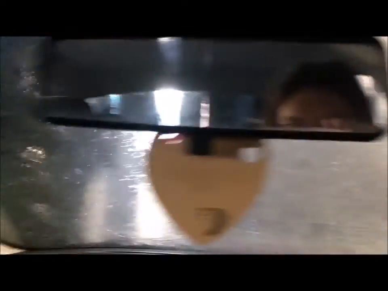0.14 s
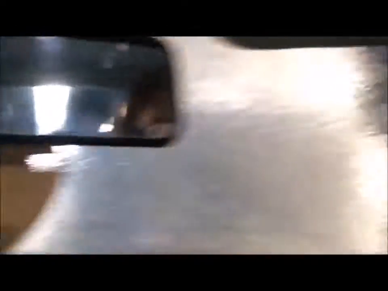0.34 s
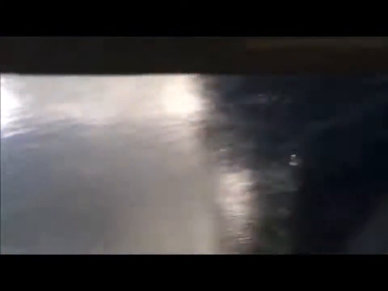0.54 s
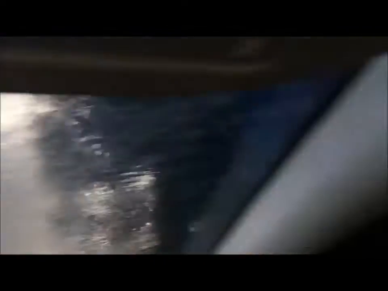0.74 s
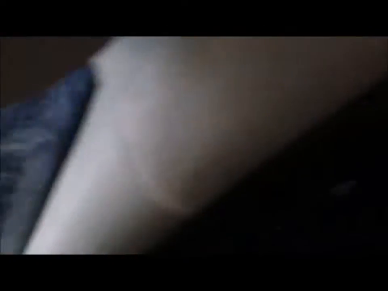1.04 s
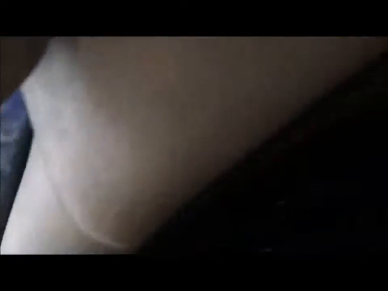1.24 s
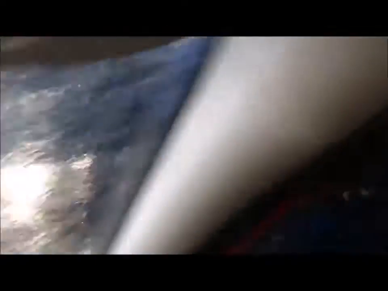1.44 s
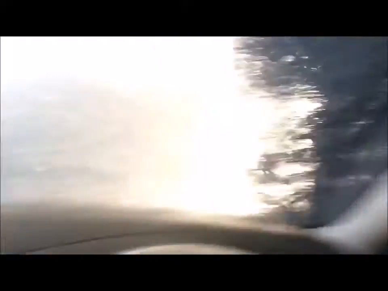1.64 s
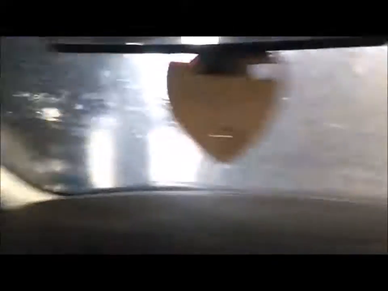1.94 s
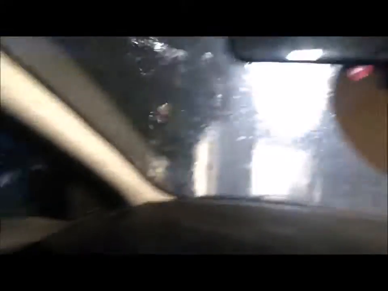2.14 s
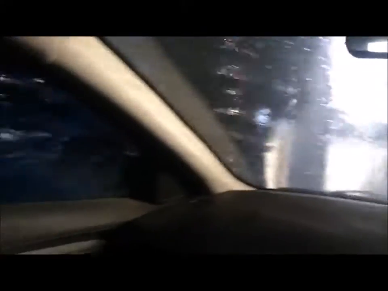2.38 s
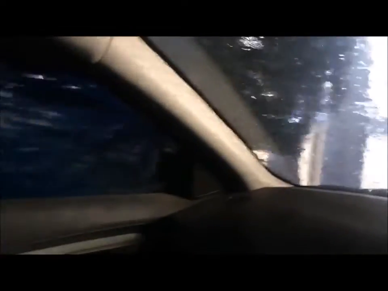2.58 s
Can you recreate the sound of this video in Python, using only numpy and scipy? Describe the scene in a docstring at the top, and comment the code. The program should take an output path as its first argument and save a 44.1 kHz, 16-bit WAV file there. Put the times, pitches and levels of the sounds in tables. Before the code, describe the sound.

Car wash jets hiss hard over a closed car, with low booming shudders through its panels

```python
"""A broad hiss of dense spray on glass and roof, inside a closed car under the jets of an automatic wash.
Spray: random drops, finer noise and ringing fat drops, in fluttering bands, through glass resonances.
Boom: the jets' pressure shakes the panels; noise drives the lowest cabin resonances, swelling as jets sweep
over."""
import sys
import numpy as np
from scipy import signal
from scipy.io import wavfile
from scipy.ndimage import uniform_filter1d

SR = 44100
rng = np.random.default_rng(int(sys.argv[2]) if len(sys.argv) > 2 else 0)


def bounce(signal):
    """Save signal as a 16-bit WAV file at the path given by the first command-line argument."""
    frames = np.transpose(np.atleast_2d(signal))
    limited = np.clip(frames, -1, 1)
    pcm = np.round(limited * 32767).astype(np.int16)
    wavfile.write(sys.argv[1], SR, pcm)


N = 119511


def from_db(db):
    """Decibels to gain."""
    return 10 ** (np.asarray(db) / 20)


def rms_one(x):
    """Scale to rms 1."""
    return x / np.sqrt(np.mean(x ** 2) + 1e-20)


def in_time(rows):
    """Table columns as curves, one value per sample."""
    time_s, *columns = np.transpose(rows)
    return [np.interp(np.arange(N) / SR, time_s, column) for column in columns]


def drift(pole_hz):
    """Slow random wander of rms about 1: noise through a double pole, run at SR / 40."""
    r = np.exp(-2 * np.pi * pole_hz * 40 / SR)
    noise = rng.standard_normal(N // 40 + 2002)
    slow = signal.lfilter([1], [1, -2 * r, r * r], noise)[2000:]  # settled part
    return np.interp(np.arange(N) / 40, np.arange(len(slow)), rms_one(slow))


def flutter(pole_hz):
    """Quick wander of rms 1: drift less its moving average over 1/7 s."""
    wander = drift(pole_hz)
    return rms_one(wander - uniform_filter1d(wander, size=SR // 7))


BOOM_EVENED, BOOM_EVEN_S = 0.5, 0.1  # share of the chance swell evened out; averaging time


def boom(modes, level_db):
    """Panel noise through each resonance twice, its swell led by the jets more than by chance."""
    out = np.zeros(N)
    for hz, width_hz, db in modes:
        r = np.exp(-np.pi * width_hz / SR)
        resonance = [1, 0, -1, 1, -2 * r * np.cos(2 * np.pi * hz / SR), r * r]
        ringing = signal.sosfilt([resonance] * 2, rng.standard_normal(N + SR))[SR:]
        out += from_db(db) * rms_one(ringing)
    chance_power = uniform_filter1d(rms_one(out) ** 2, size=int(BOOM_EVEN_S * SR)) + .01
    return from_db(level_db) * rms_one(out / chance_power ** (BOOM_EVENED / 2))


# boom levels: (time [s], deep level [dB], lower level [dB], upper level [dB])
BOOM_LEVELS = [(0.0, -39, -32, -13.5), (0.07, -37, -22, -29.5), (0.23, -24.5, -31, -21.5),
               (0.32, -36, -14.5, -25.5), (0.37, -35, -31, -24.5), (0.43, -40, -23, -22.5),
               (0.5, -36, -33, -21.5), (0.57, -43, -26, -20.5), (0.69, -27, -19.5, -21),
               (1.07, -30, -21, -20), (1.18, -18.5, -25.5, -21), (1.24, -27.5, -9.5, -15.5),
               (1.45, -37, -30, -19.5), (1.49, -25, -15, -15), (1.64, -30, -24, -19),
               (1.81, -18, -20.5, -21), (1.85, -33, -25, -20.5), (2.06, -35, -16, -17),
               (2.1, -37, -28, -26.5), (2.2, -38, -27, -26), (2.26, -27, -25, -13.5),
               (2.29, -22.5, -22.5, -23), (2.51, -28.5, -25, -16.5), (2.55, -33, -35, -21.5),
               (2.6, -26, -25, -18.5), (2.71, -28, -18.5, -23.5)]
# cabin resonances: (frequency [Hz], width of one pass [Hz], level within its group [dB])
DEEP_RESONANCES = [(38.8, 17, -5.5), (47, 20, -1)]
# as above, lower group: (frequency [Hz], width of one pass [Hz], level within its group [dB])
LOWER_RESONANCES = [(62.1, 31, 0), (77.7, 24, 1)]
# as above, upper group: (frequency [Hz], width of one pass [Hz], level within its group [dB])
UPPER_RESONANCES = [(105.8, 24, -11), (133.5, 31, 0), (158.6, 33, -7), (189.5, 37.3, -5.5)]


def cabin_boom():
    """Three groups of cabin resonances driven by the shaken panels, each with its own level curve."""
    deep_db, lower_db, upper_db = in_time(BOOM_LEVELS)
    deep = boom(DEEP_RESONANCES, deep_db)
    lower = boom(LOWER_RESONANCES, lower_db)
    return deep + lower + boom(UPPER_RESONANCES, upper_db)


SPATTER_PER_S, SPATTER_CYCLES = 400, 40.0  # mean rate; cycles to fall 60 dB
SPATTER_DB, SPATTER_SPREAD_DB = -12.5, 3.5  # level re drops and sheet; mean size excess


def spatter():
    """Scattered fat drops, each ringing briefly at one of 40 pitches; flat in colour like the sheet."""
    sizes = from_db(SPATTER_SPREAD_DB * np.minimum(rng.exponential(1, N), 4))
    sizes *= rng.choice([-1, 1], N)
    sizes *= rng.random(N) < SPATTER_PER_S / SR
    pitch_index, out = rng.integers(0, 40, N), np.zeros(N)
    for k, hz in enumerate(np.geomspace(600, 8500, num=40)):
        r, w = from_db(-60 * hz / (SPATTER_CYCLES * SR)), 2 * np.pi * hz / SR
        hits = sizes * (pitch_index == k) + 1e-18  # avoids denormals
        # hz offsets the shorter ring of high pitches
        out += hz * signal.lfilter([0, np.sin(w)], [1, -2 * r * np.cos(w), r * r], hits)
    return from_db(SPATTER_DB) * rms_one(out)


DROPS_PER_S, DROP_SPREAD_DB, DROP_SHARE = 4000, 2.5, 0.4  # share of power, rest is sheet


def water_on_glass():
    """Two rows of single random drops over a sheet of finer spray (white noise), with shared spatter."""
    sizes = from_db(DROP_SPREAD_DB * np.minimum(rng.exponential(1, (2, N)), 5))
    sizes *= rng.choice([-1, 1], (2, N))
    drops = rms_one(sizes * (rng.random((2, N)) < DROPS_PER_S / SR))
    sheet = rng.standard_normal((2, N))
    return np.sqrt(DROP_SHARE) * drops + np.sqrt(1 - DROP_SHARE) * sheet + spatter()


# resonances and dips of glass and cabin: (frequency [Hz], width [Hz], gain [dB])
GLASS_RESONANCES = [(1249, 41, 4.5), (2500, 690, 1.33), (4890, 130, -7), (4990, 110, -4), (7750, 630, -3.5)]


def through_glass(x):
    """Resonances and dips in series, each lifting or lowering one band."""
    for hz, width_hz, db in GLASS_RESONANCES:
        b, a = signal.iirpeak(hz, hz / width_hz, fs=SR)
        x = x + (from_db(db) - 1) * signal.lfilter(b, a, x)
    return x


# spray levels: (time [s], low mids level [dB], mids level [dB], treble level [dB])
SPRAY_LEVELS = [(0.031, -23.5, -22.5, -28), (0.131, -23, -25.5, -31.5), (0.181, -22, -21, -26.5),
                (0.261, -25, -24, -30), (0.321, -22.5, -22.1, -28.5), (0.451, -23, -24.5, -30),
                (0.751, -24.5, -23.5, -30), (1.001, -24, -24.5, -31.5), (1.201, -22.5, -23, -31),
                (1.401, -25.1, -25, -32.1), (1.751, -25.6, -24.5, -31), (2.001, -27.5, -25, -32),
                (2.091, -26, -23.5, -33.5), (2.201, -25.6, -24.5, -30.5), (2.351, -24.5, -25.5, -33.5),
                (2.501, -24.5, -25.5, -30), (2.666, -28, -25, -30.1), (2.696, -21.5, -23, -23)]
# spray colour in the cabin, relative within a region: (frequency [Hz], density [dB per Hz])
SPRAY_DENSITY = [(120, -35), (210, -4.5), (326, -7), (382, -8), (483, -12), (1030, -10), (1240, -14.5),
                 (1390, -15), (2950, -16.5), (4440, -23), (4950, -24), (6780, -24.5), (9000, -28.5)]
# low mids | mids | treble borders: (frequency [Hz])
REGION_BORDERS_HZ = [700, 3500]
SURGE_DB, SURGE_POLE_HZ = .55, 30.0  # shared flutter, rms below treble
PATCH_DB, PATCH_POLE_HZ = 1.72, 25.5  # flutter of each band alone, rms below treble
TREBLE_FLUTTER = 1.2  # factor on both flutters in the treble


def spray():
    """Water coloured by fluttering quarter-octave bands, levelled in three regions, heard through glass."""
    water = water_on_glass()
    colour_hz, colour_db = np.transpose(SPRAY_DENSITY)
    edges_hz = 180 * 2 ** (np.arange(24) / 4)
    regions, surge = np.zeros((3, N)), flutter(SURGE_POLE_HZ)
    for k, (low_hz, high_hz) in enumerate(zip(edges_hz, edges_hz[1:])):
        band_pass = signal.butter(2, [low_hz, high_hz], "band", fs=SR, output="sos")
        band = signal.sosfilt(band_pass, water[k % 2])  # neighbours use different rows
        centre_hz = np.sqrt(low_hz * high_hz)
        region = np.searchsorted(REGION_BORDERS_HZ, centre_hz)
        flutter_db = SURGE_DB * surge + PATCH_DB * flutter(PATCH_POLE_HZ)
        if region == 2:
            flutter_db = flutter_db * TREBLE_FLUTTER
        band_db = np.interp(np.log(centre_hz), np.log(colour_hz), colour_db)
        regions[region] += band * from_db(band_db + flutter_db)
    levels_db = in_time(SPRAY_LEVELS)
    return through_glass(sum(from_db(db) * rms_one(x) for db, x in zip(levels_db, regions)))


def scene():
    """Booming cabin and spray, heard at one point."""
    return (cabin_boom() + spray())[None]


CUTOFF_HZ = 9100


def record(dry):
    """Steep elliptic low-pass: 0.5 dB ripple, 90 dB stopband."""
    return signal.sosfilt(signal.ellip(13, .5, 90, CUTOFF_HZ, fs=SR, output="sos"), dry)


dry = scene()
out = record(dry)
bounce(out)
```